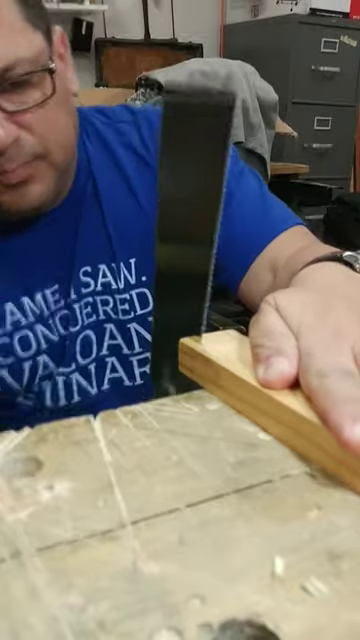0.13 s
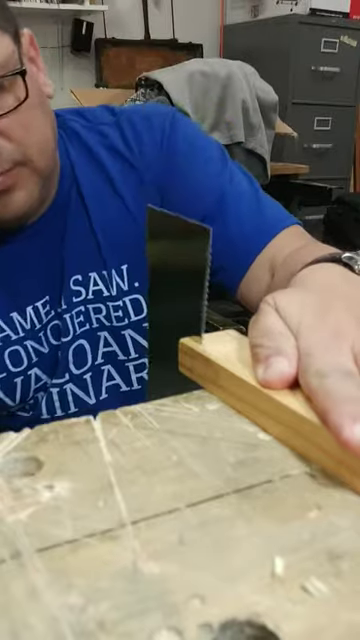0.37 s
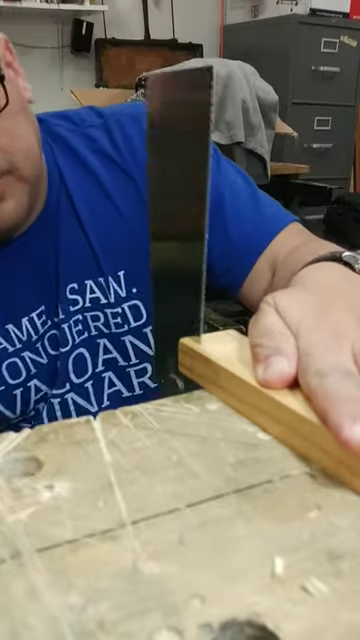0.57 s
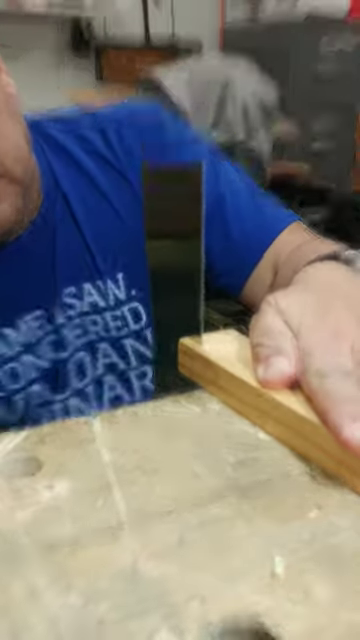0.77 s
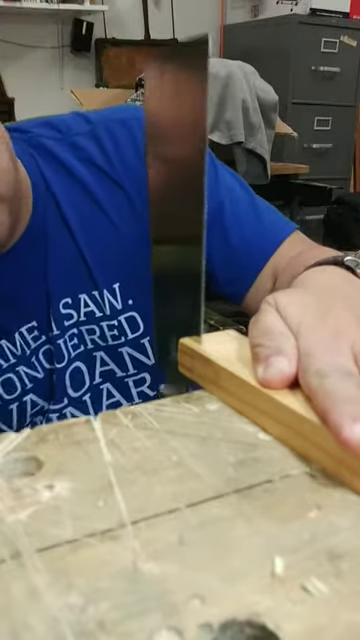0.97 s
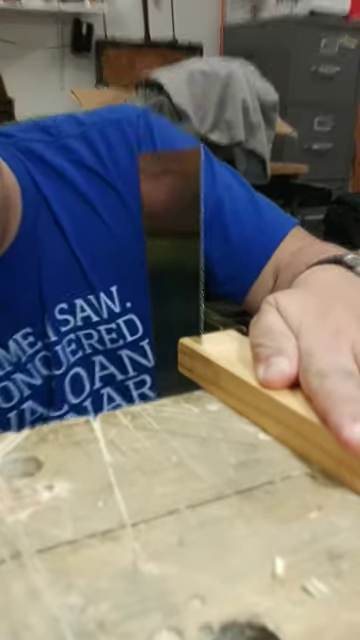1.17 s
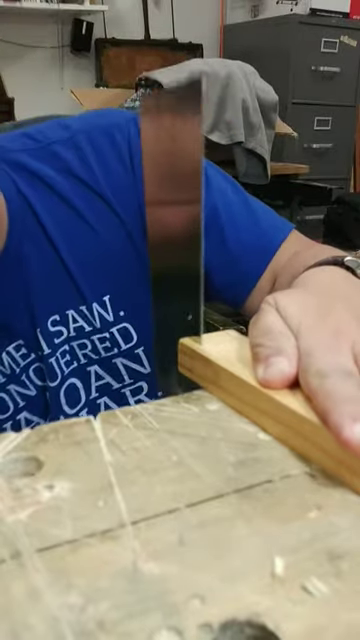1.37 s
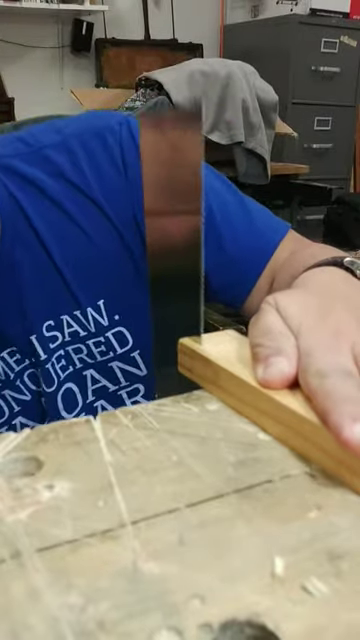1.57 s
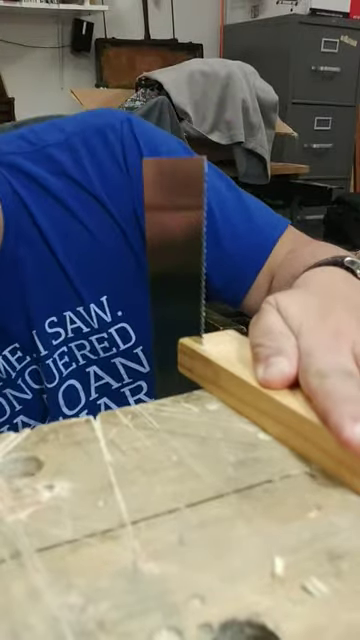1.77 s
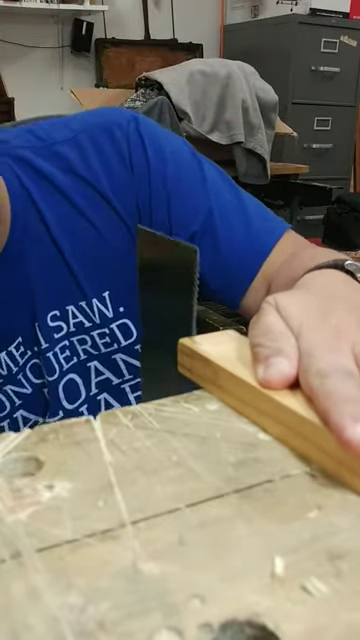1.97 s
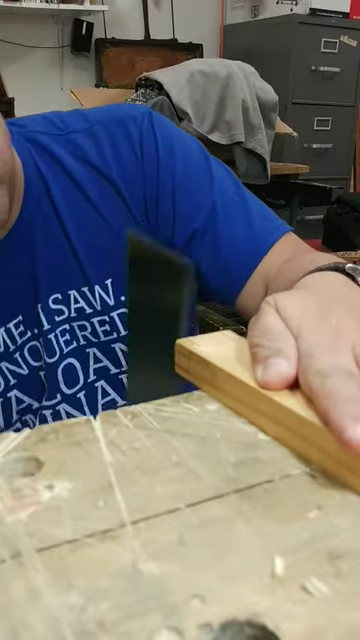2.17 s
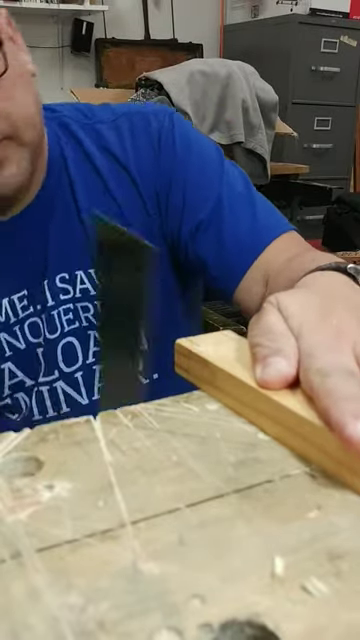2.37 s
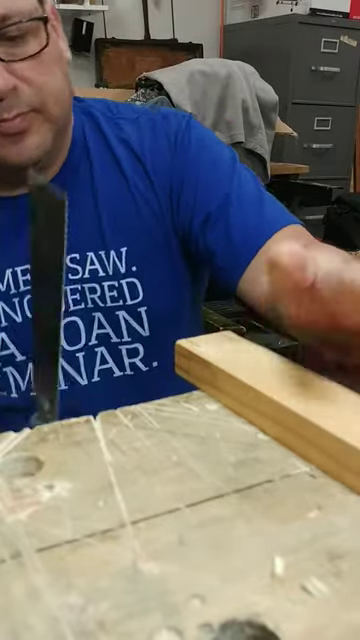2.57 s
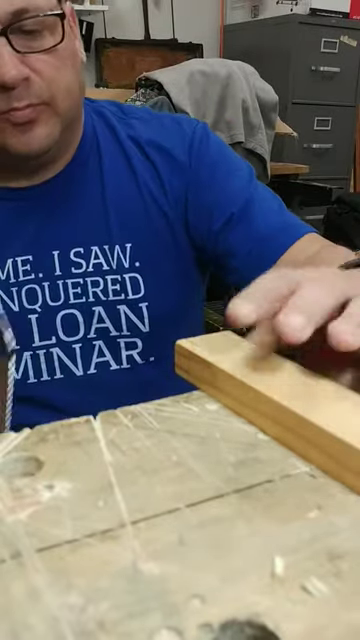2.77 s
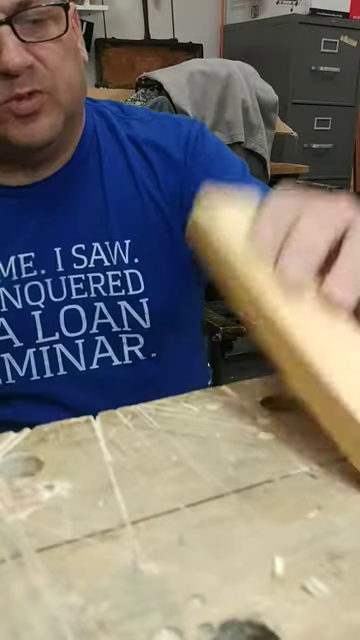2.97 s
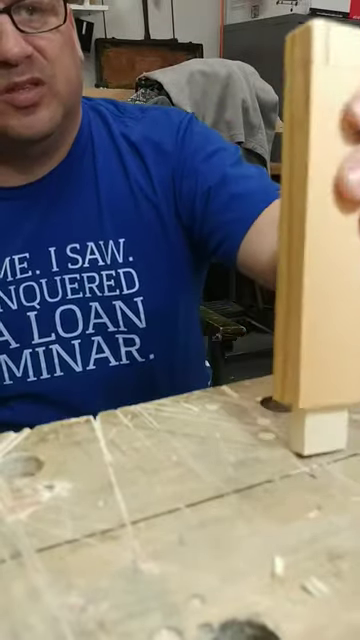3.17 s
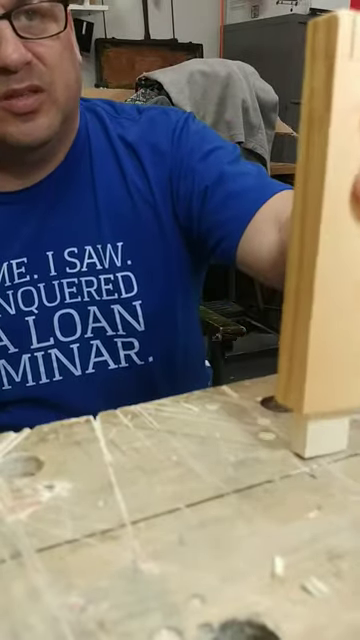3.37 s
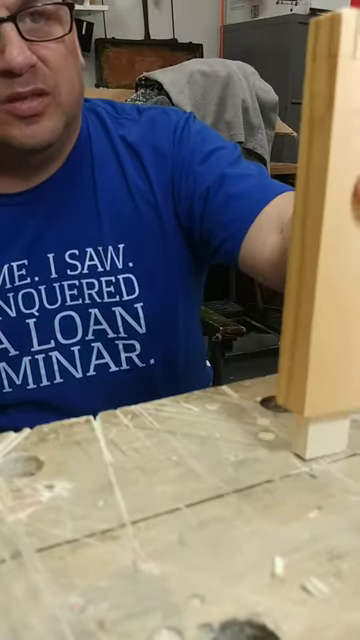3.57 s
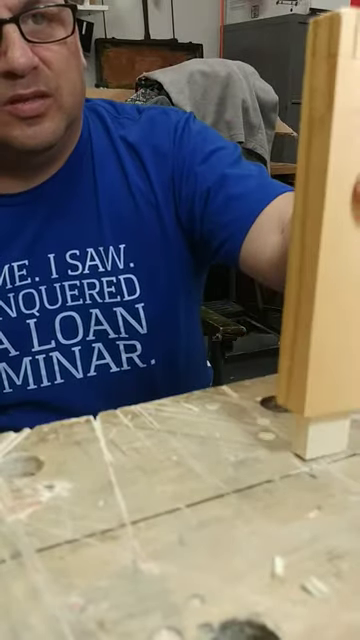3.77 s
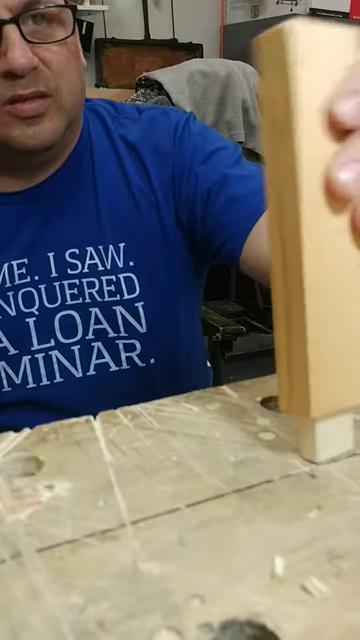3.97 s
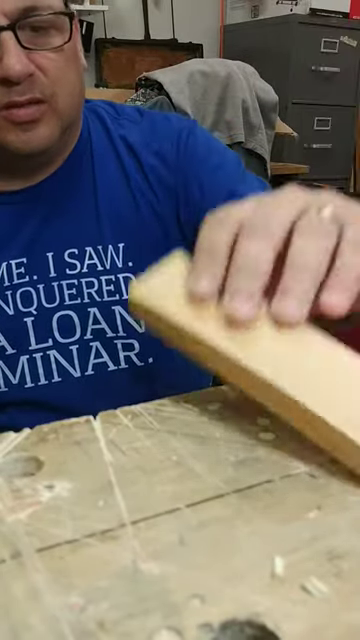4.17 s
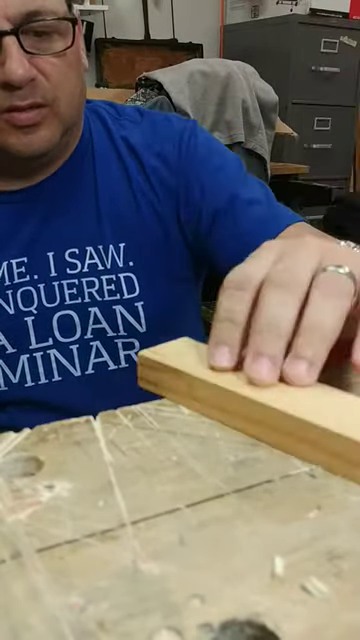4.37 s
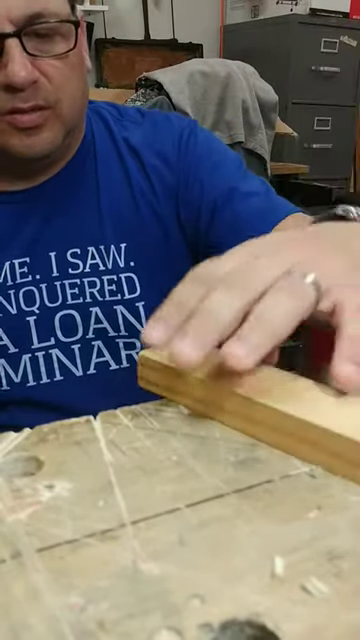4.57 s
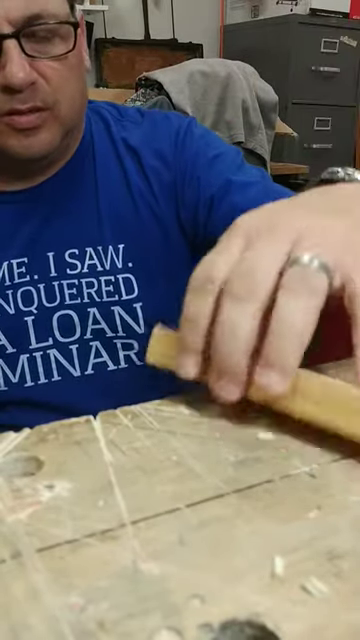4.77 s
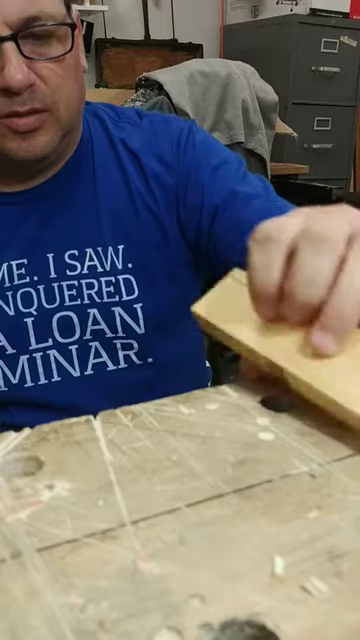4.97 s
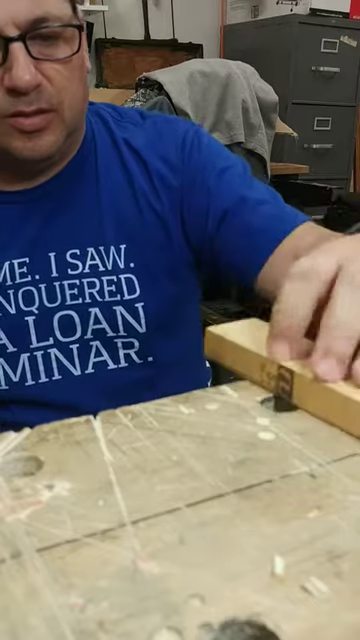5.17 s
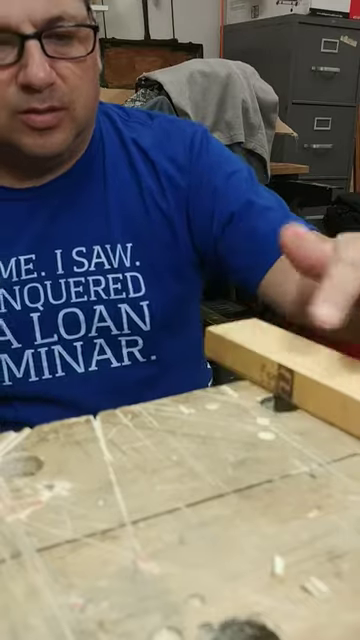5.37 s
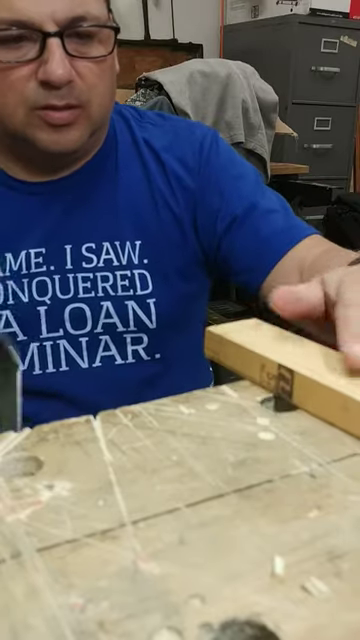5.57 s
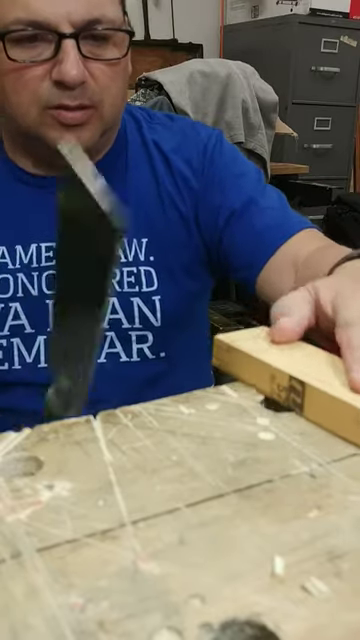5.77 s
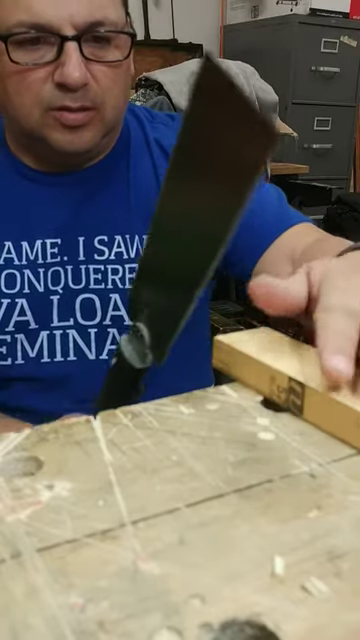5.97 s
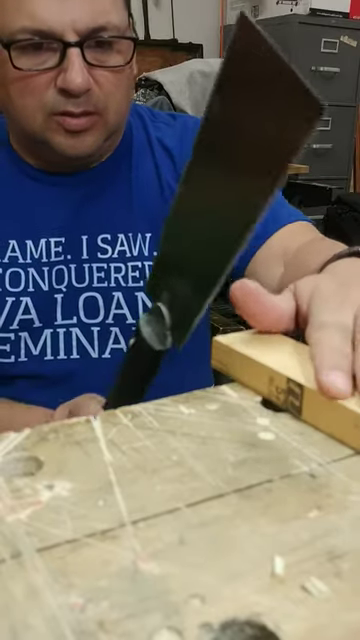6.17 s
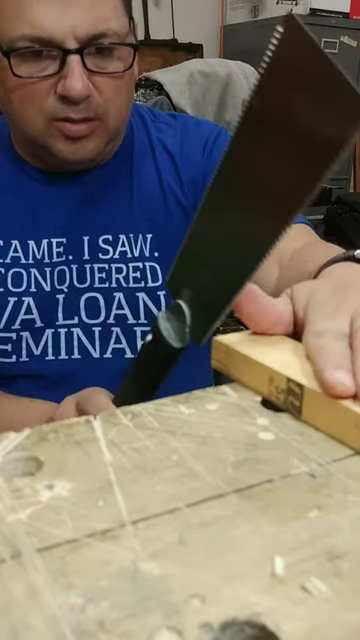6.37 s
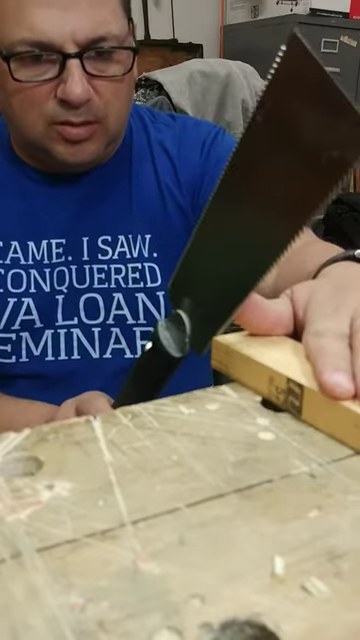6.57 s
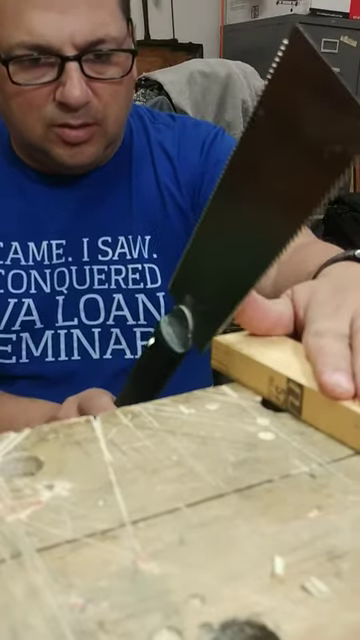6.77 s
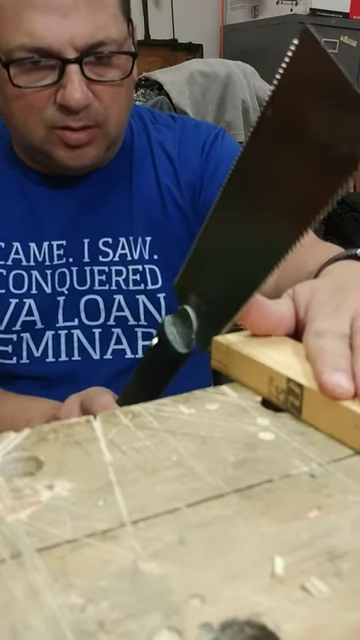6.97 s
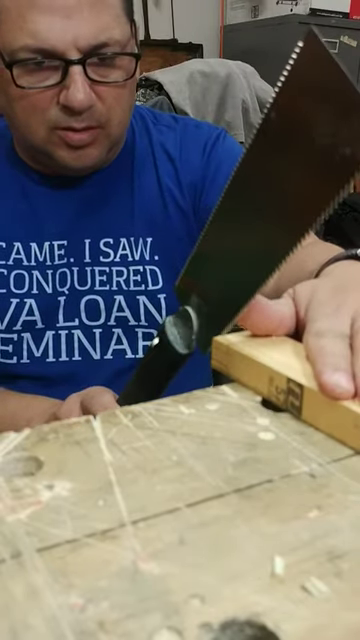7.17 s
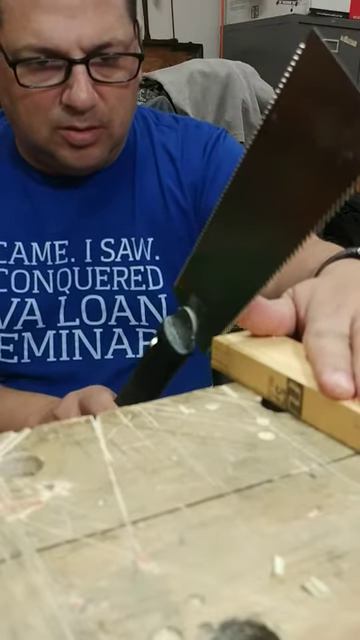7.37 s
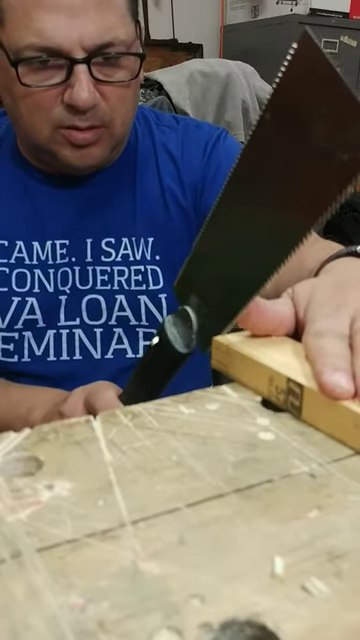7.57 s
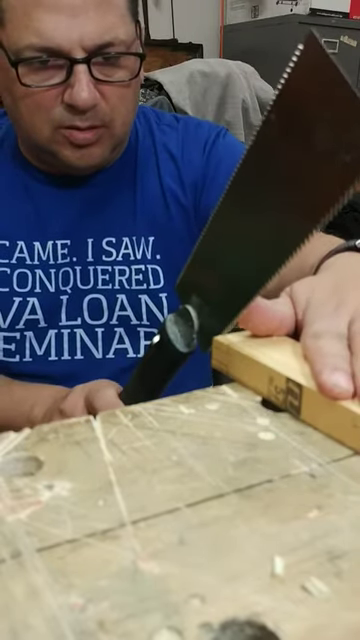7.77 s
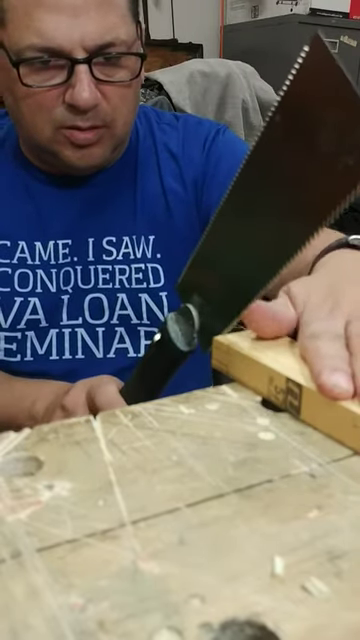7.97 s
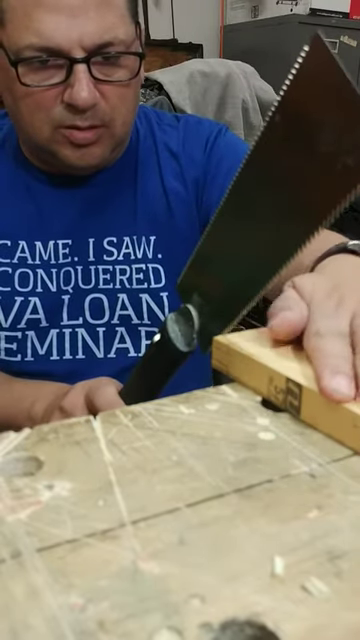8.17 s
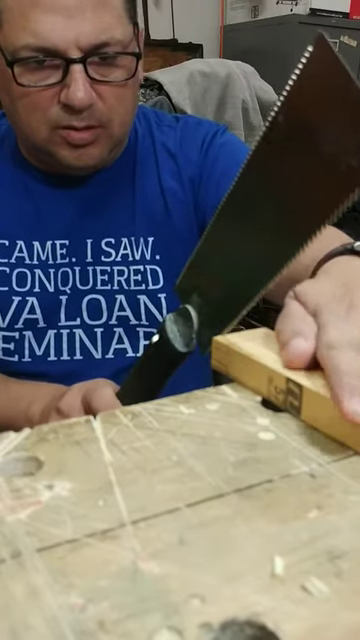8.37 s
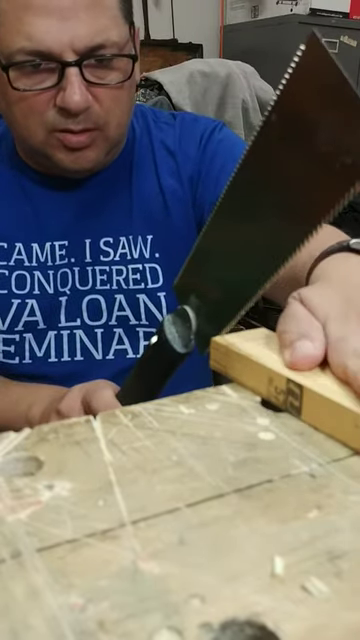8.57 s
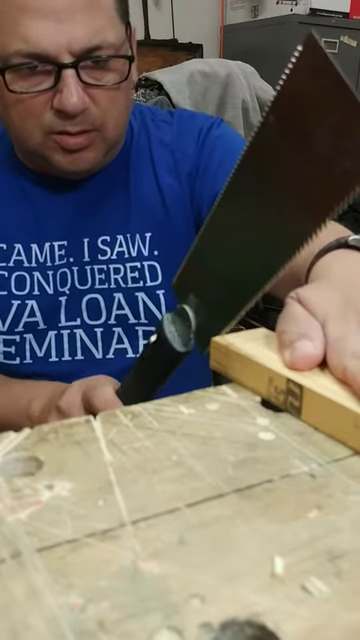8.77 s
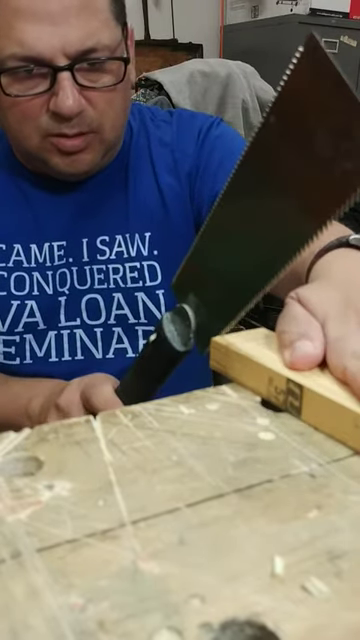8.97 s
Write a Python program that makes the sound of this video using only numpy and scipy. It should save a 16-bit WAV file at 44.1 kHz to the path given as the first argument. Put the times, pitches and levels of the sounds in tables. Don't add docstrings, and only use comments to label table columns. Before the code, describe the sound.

A quiet indoor workshop, heard very close on the bench in stereo with a short room tail. From 0 s, already in motion, a hand saw rasps loudly through a wooden block: gritty, hollow, buzzing strokes, longer at first, alternating about every quarter second and growing shorter until 1.9 s. A lighter stroke at 2 s dies into small taps, a faint clear metallic ring and a thin scrape by 2.5 s. Around 3.0-3.15 s the loose block scrapes and clatters with dull knocks; tiny ticks follow at 3.3 and 3.6. A dragging scrape at 4.05-4.2 leads to hard, bright wooden clacks at 4.35-4.45. More sliding and soft thuds from 4.75 end in a loud double or triple knock at 5.15. Afterwards, only soft hand rubs, low bench bumps, faint taps and ticks remain until about 9 s, over quiet rumble and thin air hiss.

```python
import sys
import numpy as np
from scipy import signal
from scipy.fft import rfft, irfft, next_fast_len
from scipy.io import wavfile
from scipy.ndimage import uniform_filter1d, map_coordinates

SR = 44100
rng = np.random.default_rng(int(sys.argv[2]) if len(sys.argv) > 2 else 0)


def invert_db(x):
    u = np.asarray(x, float) / 20
    return 10 ** u


def to_wav(s):
    ch = np.atleast_2d(s).T
    pcm = np.round(np.clip(ch, -1, 1) * 32767)
    wavfile.write(sys.argv[1], SR, pcm.astype(np.int16))


N = 397782
SIZE = 2 * next_fast_len(N // 2 + SR // 4)
HZ = np.fft.rfftfreq(SIZE, 1 / SR)
T = np.arange(N) / SR

# start_s, length_s, level_db, bench_db, brightness_db
PULLS = [
    (0.205, 0.15, -13.5, 1.5, -6),
    (0.736, 0.11, -14.5, 2.5, -2),
    (1.117, 0.13, -14.5, 2.5, -1),
    (1.455, 0.094, -14.5, 1.5, -3.5),
    (1.727, 0.068, -14, -1, -3),
    (1.93, 0.12, -19, -16, 4.5),
    (2.216, 0.051, -35.5, -15, 9.5),
    (2.353, 0.069, -58.5, -5, 35.5),
]
# frequency_hz, width_hz, level_db
BENCH_MODES = [(67, 12, -13.5), (89, 63, -6), (131, 14, 4), (203.2, 63, -12)]
# frequency_hz, width_hz, level_db
HELD_MODES = [(363, 41, -1), (502, 38, 3.5), (577.7, 48, -0.5), (657.6, 24, -3), (740.6, 22, -6.5),
              (857, 37, -3.5), (1046, 180, -6.5), (1442, 28, -5)]
# frequency_hz, width_hz, level_db
BITE_MODES = [(1650, 130, -0.5), (1770, 180, 1), (2163, 140, -5.5), (2810, 58, 8), (3100, 150, -7)]
# frequency_hz, width_hz, level_db
FREE_RING_MODES = [(2950, 74, 3.5), (4800, 74, -22), (6030, 81, -8)]


def saw():
    # start_s, length_s, level_db, bench_db, brightness_db
    returns = [
        (-.1, 0.17, -17, 0.5, -3.5),
        (.47, 0.17, -16, 3, -1),
        (.925, 0.12, -17, -1.5, 5),
        (1.32, .06, -15, -1, -2),
        (1.605, 0.059, -17.5, 0, -1.5),
    ]
    # centre_s, spread_s, level_db
    surges = [(0.052, 0.018, 1), (0.236, .015, 1), (0.271, 0.019, 2), (0.331, 0.014, 0), (.38, .015, -6),
              (.52, 0.021, 0), (0.576, 0.021, 2), (0.622, 0.016, 0.5), (.765, .015, 3.5), (0.814, .01, -2),
              (.855, .015, 4), (1.0, 0.016, 1), (1.045, 0.014, 1), (1.14, .012, 0), (1.18, 0.017, 1),
              (1.226, 0.016, 1), (1.364, 0.014, 1), (1.4, 0.014, -2), (1.47, .01, -2.5), (1.506, .015, 2),
              (1.565, 0.014, 3), (1.645, .012, 1), (1.74, .01, -4), (1.765, 0.014, 0.5), (1.82, 0.014, 2.5),
              (1.95, .012, 2), (1.98, 0.014, 1), (2.035, 0.016, -1), (2.065, 0.0094, 2)]
    # frequency_hz, level_db (per Hz)
    body_colour = [(88, -43), (150, -21), (347, 1.5), (426, 2.5), (496, -14), (1230, -12), (2720, -26.5),
                   (4000, -38), (5200, -66.5), (8800, -120)]
    # frequency_hz, level_db (per Hz)
    rasp_colour = [(1880, -27.5), (3200, -5), (3330, -8), (3580, -4.5), (5250, -16), (6360, -16.5),
                   (7360, 3.5), (8860, -13.5), (11600, -13.5), (12600, -24.5), (15500, -26.5)]

    forces = strokes(PULLS, 0.23, (1, 0, -10, -21))
    forces = forces + strokes(returns, 0.6, (-2.5, -7, -20, -20.5))
    centre, spread, db = np.transpose(surges)[:, :, None]
    coarse = T[::44]
    surge_db = np.sum(db * np.exp(-0.5 * ((coarse - centre) / spread) ** 2), axis=0)
    block, bench, upper, bite, rasp = forces * invert_db(np.interp(T, coarse, surge_db))
    block, side, upper, bite = (force * invert_db(1.7 * walk(18)) for force in (block, block, upper, bite))

    teeth = jolts(120 + 920 * np.sqrt(block), 0.45, 3.0)
    push = invert_db(1.6 * walk(70)) * (teeth + 0.71 * rng.standard_normal(N))
    body = invert_db(1.0) * on_hz(body_colour)
    deep, low = soft(570, order=4), soft(1200, order=3)
    mid = 1 / (1 + (HZ / 1500) ** 4)
    low_body = body * low * (1 - deep)
    wood = ring(push, (
        (bench, modes(BENCH_MODES)),
        (invert_db(-4.0) * np.sqrt(block * bench), causal(modes(HELD_MODES[:1]), body * deep)),
        (block, causal(modes(HELD_MODES[1:2]), low_body)),
        (invert_db(-5.5) * side, causal(modes(HELD_MODES[2:5]), low_body)),
        (upper, causal(modes(HELD_MODES[5:]), invert_db(4.5) * body * mid * (1 - low))),
        (bite, causal(modes(BITE_MODES), invert_db(26.5) * body * (1 - mid)))))
    fibres = rasp * grit(teeth, 0.87, 0.49, rasp_colour, 2.1)
    return invert_db(-9.0) * bend(wood, 0.025, 16) + invert_db(-7.0) * fibres


def strokes(rows, rise, mix_db):
    start, length, db, bench, bright = np.transpose(rows)
    bench_db, upper_db, bite_db, rasp_db = mix_db
    layers = [(db, 1),
              (db + bench + bench_db, 0.8),
              (db + 0.22 * bright + upper_db, 1.3),
              (db + 0.49 * bright + bite_db, 1.5),
              (db + bright + rasp_db, 1.4)]
    return gesture(start, rise * length, (1 - rise) * length, 420, layers)


def knocks():
    # start_s, knock_db, thump_db, click_db, contact_ms
    landings = [(3.034, -19.5, -15, -42, 0.7), (3.047, -20, -20, -18, .8), (3.061, -29, -24, -21, .7),
                (3.115, -24.5, -10, 0, 0.69), (3.137, -37.5, 6, -6, 0.81), (4.341, -2, -22, -30, 0.4),
                (4.374, -4, -23.5, -12, 0.36), (4.436, -13.5, -26, -24, 0.63), (4.975, -18, -14, -11, .8),
                (5.037, -24.5, -10, -36, 1.2), (5.144, 1.5, -42, -56, 0.86), (5.16, -7.5, -35.5, -52, 1.2),
                (5.181, -8, -34, -50, 1.22)]
    # start_s, knock_db, thump_db, click_db
    taps = [(0.696, -31, -20, 5.5), (7.18, -61, -3.5, -17), (2.231, -21, -17, -32), (2.268, -17, -47, -43),
            (2.362, -58, -18, -20), (2.579, -26.5, -14, -38.5), (2.251, -33, -28, -35),
            (2.708, -34.5, -24, -14.5), (3.569, -49, -24, -5), (4.69, -44, -13, -16),
            (4.767, -39, -5.5, -9), (4.802, -38.5, -9, -25), (4.833, -41, -17, -20),
            (6.082, -55.5, 13.5, -1.5), (6.698, -56, 3, -13), (7.294, -49.5, -18, -26.5),
            (7.379, -50.5, -23, -16), (7.458, -65.5, -1, -9), (7.72, -46.5, -14, -26),
            (7.83, -51, -2.5, -16), (8.606, -42.5, 1, -14.5)]
    first_tooth_db = (1.5, 0, -9.5, -8.5, -6, -1)
    # frequency_hz, width_hz, level_db
    landing_modes = [(300, 65, -12), (520, 69, 1.5), (613, 37, -1), (730.7, 50, -2.5), (830, 60, -0.5),
                     (963, 140, 0), (1350, 190, -5), (1558, 180, -7), (1950, 230, -10), (2210, 180, -10),
                     (2523, 280, -14.5), (3144, 500, -15.5)]

    held, loose, thump, click = np.zeros((4, N))
    first_teeth = []
    for (start, _, db, bench, _), tooth_db in zip(PULLS, first_tooth_db):
        first_teeth.append((start + 0.013, db + tooth_db, bench - 8, -15))
    held_rows = [(*row, 1) for row in [*taps, *first_teeth]]
    for blow, rows in ((loose, landings), (held, held_rows)):
        for start, db, thump_db, click_db, contact_ms in rows:
            i = int(start * SR)
            push = np.hanning(int(np.clip(contact_ms, 0.1, 4) * SR / 1000) + 3)
            push = push / push.sum()
            blow[i:i + len(push)] += invert_db(db) * push
            thump[i:i + len(push)] += invert_db(db + thump_db) * push
            click[i] += invert_db(db + click_db)

    t = T[:SR // 40]
    chatter = rng.standard_normal(len(t)) * invert_db(-60 * t / 0.018)
    chatter = rfft(chatter / np.sqrt(np.sum(chatter ** 2)), SIZE)

    broad = abs(modes([(930, 3300, 0.0037)]))
    roll = soft(3300, order=5) * invert_db(32.0)
    held_body = causal(roll * (abs(modes(HELD_MODES[1:])) + invert_db(-14) * broad))
    loose_body = causal(roll * (invert_db(1.0) * abs(modes(landing_modes)) + invert_db(-21) * broad))
    edge = abs(modes([(2200, 1300, 0.003)])) ** 2
    edge = edge + invert_db(-8.5) * abs(modes(BITE_MODES)) + invert_db(-17) * abs(modes(FREE_RING_MODES))
    edge = invert_db(21.5) * causal(edge * soft(2200, order=5))
    bench = invert_db(49.5) * modes(BENCH_MODES) / (1 + 1j * HZ / 500)

    struck = respond(held, held_body) + respond(loose, loose_body * (0.12 + 1.05 * chatter))
    return struck + respond(thump, bench) + respond(click, edge * (0.45 + 0.7 * chatter))


def slides():
    # start_s, rise_s, hold_s, level_db, brightness_db
    moves = [(2.962, 0.021, 0.017, -56.5, 5), (3.026, 0.013, .02, -36, -7),
             (3.054, 0.014, 0.066, -34.5, 1.5), (4.043, 0.041, 0.034, -38, 6), (4.101, 0.034, .04, -36, -5),
             (4.161, .02, .04, -41, -12), (4.75, 0.011, 0.0064, -49.5, 1), (4.805, 0.018, 0.046, -55, -3),
             (4.873, 0.057, .035, -44, 6), (4.964, .01, 0.015, -40.5, 0), (5.025, 0.01, .025, -54.5, -12),
             (5.071, 0.013, 0.02, -56.5, 7.5)]
    # frequency_hz, width_hz, level_db
    free_modes = [(1190, 130, 7.5), (1680, 300, -2), (1910, 300, 0), (2400, 270, -9.5)]
    # frequency_hz, width_hz, level_db
    drag_modes = [(290, 51, 9.5), (494, 180, 4.5), (653, 123, -7)]
    # frequency_hz, level_db (per Hz)
    hiss_colour = [(1880, -33), (3200, -3), (3750, -11.5), (5220, -16.5), (5840, -4.5), (6080, 2.5),
                   (8680, -6.5), (10900, -5), (14500, -34), (15500, -45.5)]

    start, rise, hold, db, bright = np.transpose(moves)
    drag_db, hiss_db, ring_db = 6, -7, -3
    layers = [(db, 1),
              (db + drag_db - 0.19 * bright, 0.75),
              (db + hiss_db + bright, 0.8),
              (db + ring_db + 0.95 * (db + 37.5), 1.2)]
    scrape, drag, hiss, clear = gesture(start, rise, hold, 601, layers)
    slips = jolts(np.full(N, 400.0), 0.9, 4.5)
    push = invert_db(1.8 * walk(40)) * (slips + 1.1 * rng.standard_normal(N))
    wood = ring(push, ((scrape, causal(modes(free_modes), invert_db(2.0) * modes(HELD_MODES))),
                       (drag, modes(drag_modes)),
                       (clear, modes(FREE_RING_MODES))))
    return invert_db(-4.0) * wood + invert_db(-4.0) * hiss * grit(slips, 1.4, 0.51, hiss_colour, 3.2)


def rubs():
    # start_s, length_s, level_db, body_db, hiss_db
    touches = [(2.499, 0.081, -60.5, 5, 0.5), (2.671, 0.1, -54, -10, 0), (4.794, .07, -54, 9, -4),
               (5.139, 0.046, -57.5, -5, 4), (5.683, 0.093, -57, 10.5, -12), (5.758, .085, -46.5, 8, -13),
               (6.058, 0.037, -68.5, 13.5, 1.5), (7.442, .03, -76.5, -5.5, 4.5),
               (7.712, 0.022, -67, 1, -13), (7.763, 0.065, -73.5, 6.5, -1), (8.193, .04, -67.5, -3, -0.5),
               (8.25, .06, -66, 10, -9.5), (8.298, .15, -61.5, -5, -3), (8.487, 0.044, -57.5, -6, -1.5),
               (8.59, .05, -59, -2, -1.5)]
    # frequency_hz, level_db (per Hz)
    skin_colour = [(530, -38.5), (900, 0.5), (1060, -11.5), (1160, 1.5), (1270, -6), (2510, -15.5),
                   (3220, -19), (4830, -26.5), (5640, -33.5), (7600, -24.5), (9200, -36), (11300, -32),
                   (15500, -50.5)]

    start, length, db, body_db, hiss_db = np.transpose(touches)
    layers = [(db, 1), (db + body_db, 0.9), (db + hiss_db, 0.8)]
    rise = 0.34
    rub, body, hiss = gesture(start, rise * length, (1 - rise) * length, 405.5, layers)
    low = 1 / (1 + (HZ / 5400) ** 8)
    skin = on_hz(skin_colour) * (1 + abs(modes([(4854, 69, 0)])))
    push = invert_db(2.0 * walk(35)) * rng.standard_normal(N)
    return invert_db(-5.0) * ring(push, ((rub, skin * low), (body, modes(HELD_MODES[:5])), (hiss, skin * (1 - low))))


def steel():
    # start_s, damped_s, frequency_hz, level_db, t60_s
    blade_rings = [
        (2.276, 2.52, 603, -41, 0.7),
        (2.272, 2.69, 2013, -61, 3.5),
        (2.275, 2.5, 2357, -63, 0.77),
        (2.26, 2.33, 5830, -58, .5),
        (2.32, 2.383, 6300, -56, .5),
        (2.27, 2.35, 7900, -60, .5),
        (2.37, 2.46, 7250, -61, .5),
        (6.083, 6.26, 2074, -81, 1.5),
        (7.482, 7.61, 2073, -80.5, 3.5),
    ]
    # start_s, level_db, frequency_hz
    ticks = [
        (3.272, -41.5, 4090),
        (3.5701, -44.5, 3420),
        (3.599, -56, 3400),
        (5.5623, -51.5, 3417),
        (6.29, -50.5, 5393),
    ]

    out = np.zeros(N)
    for start, end, hz, db, t60 in blade_rings:
        i, t = int(start * SR), T[:int((end - start) * SR)]
        fade = np.clip((end - start - t) / 0.013, 0, 1) * np.clip(t / 0.0048, 0, 1)
        out[i:i + len(t)] += invert_db(db - 60 * t / t60) * np.sin(2 * np.pi * hz * t) * fade
    for start, db, hz in ticks:
        i, t = int(start * SR), T[:SR // 50]
        out[i:i + len(t)] += invert_db(db - 60 * t / 0.004) * np.sin(2 * np.pi * hz * t)
    return out


def room(x):
    # frequency_hz, t60_s, level_db
    decays = [(106, 0.32, -17), (280, 0.22, -7), (577, 0.42, -6), (1397, 0.39, -10.5), (2730, 0.33, -7.5),
              (8215, 0.48, -8)]
    tail, t = 0, T[:SR // 2]
    for hz, t60, db in decays:
        envelope = invert_db(-60 * t / t60) * np.clip((t - 0.002) / 0.0089, 0, 1)
        mid, side = rng.standard_normal((2, len(t))) * envelope
        noise = mid + min(0.14 + hz / 900, 1) * side * np.array([[1], [-1]])
        band = signal.butter(2, [hz / 1.55, hz * 1.55], "bandpass", fs=SR, output="sos")
        noise = signal.sosfilt(band, noise)
        tail = tail + invert_db(db) * noise / np.sqrt(np.sum(noise[0] ** 2) * SR / (5.3 * hz))
    return signal.oaconvolve(x[None], tail, axes=1)[:, :N]


def shop():
    # start_s, length_s, level_db
    shoves = [(2.518, .08, -52), (2.99, .17, -47), (3.419, 0.3, -61.5), (4.056, 0.18, -48),
              (4.325, 0.064, -44), (4.738, .06, -54.5), (4.928, 0.05, -43.5), (5.11, 0.065, -41.5),
              (5.503, 0.092, -68.5), (5.699, .16, -56), (6.036, 0.051, -47.5), (6.62, 0.11, -55),
              (7.188, 0.12, -67), (7.607, .12, -57), (7.783, .07, -55), (8.254, .05, -62),
              (8.559, .07, -56), (8.793, 0.12, -64.5)]
    # frequency_hz, level_db (per Hz)
    rumble_colour = [(15, -48), (25, -17.5), (41, -9.5), (64, -0.5), (125, -5), (184, -19.5), (250, -28.5),
                     (320, -59), (550, -120)]
    # frequency_hz, level_db (per Hz)
    air_colour = [(120, -39.5), (200, -11), (446, -14), (555, -4.5), (756, -17), (907, -11.5),
                  (1430, -18.5), (2170, -22), (3130, -20.5), (3620, -20), (5120, -23.5), (7640, -17),
                  (8370, -22.5), (11400, -19), (15500, -36)]

    start, length, db = np.transpose(shoves)
    rise = 0.7
    shove = gesture(start, rise * length, (1 - rise) * length, 163, [(db, 1)])[0]
    force = invert_db(-67 + 2.6 * walk(5)) + shove
    calm = np.minimum(force, invert_db(-56.5))
    push = invert_db(1.7 * walk(17)) * rng.standard_normal(N)
    rumble = ring(push, ((calm, on_hz(rumble_colour)), (force - calm, modes(BENCH_MODES))))
    hiss = invert_db(0.59 * walk(5)) * respond(rng.standard_normal((2, N)), on_hz(air_colour))
    return rumble + invert_db(-68) * 0.6 * unit(hiss)


def gesture(start, rise, hold, fall_db_s, layers):
    linger, slower = 0.2, 3.2
    step = T[::44]
    t = step - start[:, None]
    lost_db = fall_db_s * np.maximum(t - (rise + hold)[:, None], 0)
    fall = (1 - linger) * invert_db(-lost_db) + linger * invert_db(-lost_db / slower)
    up = np.clip(t / rise[:, None], 0, 1) ** 1.5
    return np.array([np.interp(T, step, invert_db(db) @ (up * fall ** steep)) for db, steep in layers])


def jolts(hz, jitter, scatter_db):
    timing, size = rng.standard_normal((N // 20, 2)).T
    at = np.searchsorted(np.cumsum(hz) / SR, np.cumsum(np.exp(jitter * timing)))
    return unit(np.bincount(at, invert_db(scatter_db * size), N + 1)[:N])


def grit(catches, hold_ms, share, colour, patchy_db):
    flare = unit(signal.lfilter([1], [1, -np.exp(-1000 / SR / hold_ms)], catches))
    noise = (1 + share * flare) * rng.standard_normal(N)
    edges = [0 * HZ, soft(10000, order=6), soft(10000, order=6), 1 + 0 * HZ]
    total = 0
    for below, above in zip(edges, edges[1:]):
        band = np.sqrt(np.maximum(abs(above) ** 2 - abs(below) ** 2, 0))
        total = total + respond(invert_db(patchy_db * walk(22)) * noise, on_hz(colour) * band)
    return unit(total)


def ring(push, parts):
    push = unit(push)
    spectrum = 0
    for force, gain in parts:
        spectrum = spectrum + rfft(force * push, SIZE) * gain / np.sqrt(np.mean(abs(gain) ** 2))
    return irfft(spectrum, SIZE)[:N]


def modes(table):
    total = 0
    for k, (hz, width, db) in enumerate(table):
        damping = 1j * HZ * width
        total = total + (-1) ** k * invert_db(db) * damping / (hz * hz - HZ ** 2 + damping)
    return total


def causal(*gains):
    power = sum(abs(gain) ** 2 for gain in gains) + 1e-12
    cepstrum = irfft(np.log(power) / 2)
    half = len(cepstrum) // 2
    cepstrum[1:half] *= 2
    cepstrum[half + 1:] = 0
    return np.exp(rfft(cepstrum))


def bend(x, share, rate):
    drift = share * walk(rate)
    offset = signal.lfilter([1], [1, -np.exp(-rate / SR)], drift)
    return map_coordinates(x, [np.arange(N) + offset], mode="nearest")


def walk(rate):
    k = int(SR / rate)
    held = np.repeat(rng.standard_normal(N // k + 1), k)
    return 1.5 * uniform_filter1d(uniform_filter1d(held, k), k)[:N]


def soft(hz, order):
    return 1 / np.sqrt(1 + (HZ / hz) ** (2 * order))


def on_hz(points):
    hz, db = np.transpose(points)
    return invert_db(np.interp(np.log(HZ + 1), np.log(hz), db))


def respond(x, gain):
    return irfft(rfft(x, SIZE) * gain, SIZE)[..., :N]


def unit(x):
    return x / np.sqrt(np.mean(x ** 2))


def scene():
    # frequency_hz, level_db
    port_level = [(60, -0.5), (200, 3), (400, -4.5), (1300, -7.5), (2400, -11.5), (4400, 0.5),
                  (7400, -14.5), (9200, -6), (11500, 14), (15000, 11)]
    # frequency_hz, phase_rad
    port_phase = [(0, 0), (1030, -.9), (1460, -3.6), (1720, -7.5), (2240, -11.5), (2760, -12.5),
                  (3270, -10.1), (5680, -8.6), (7840, -3.3), (11500, 5.3), (16000, -5)]

    sawing, blows, handling, metal = saw(), knocks(), slides() + rubs(), steel()
    close = sawing + handling + blows + metal
    hz, rad = np.transpose(port_phase)
    scatter = np.clip(HZ / 4200, 0, 1) ** 2 * 2.6 * walk(70)[:len(HZ)]
    left = respond(close, np.exp(1j * (np.interp(HZ, hz, rad) + scatter)))
    direct = np.array([left, close])
    sent = invert_db(-2.0) * respond(sawing, 0.7 + 0.5 * soft(950, order=3))
    far = room(sent + invert_db(-13.0) * handling + blows + invert_db(-12.0) * metal)
    tilt = np.sqrt(on_hz(port_level))
    lean = HZ / np.hypot(HZ, 55)
    return invert_db(3.5) * respond(direct + far, lean * np.array([tilt, 1 / tilt])) + shop()


def low_pass(x):
    return signal.sosfilt(signal.butter(12, 15690, fs=SR, output="sos"), x)


def record(dry):
    dip = 1 - 0.61 * modes([(9017, 1500, 0.00064)])
    heard = respond(dry, dip * soft(12600, order=4))
    return low_pass(np.tanh(1.039 * heard) / 0.95)


dry = scene()
out = record(dry)
to_wav(out)
```